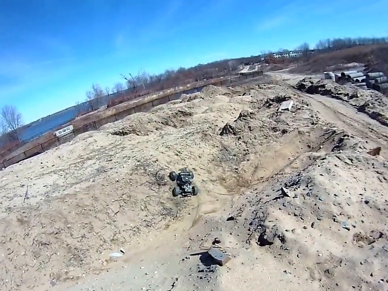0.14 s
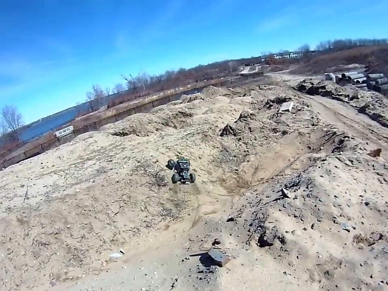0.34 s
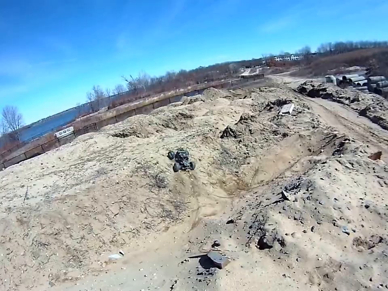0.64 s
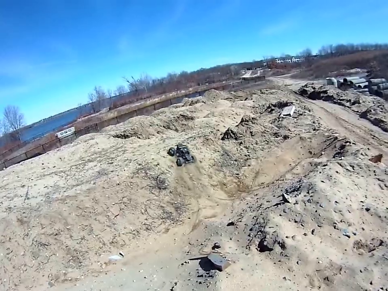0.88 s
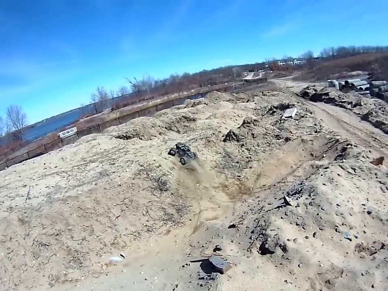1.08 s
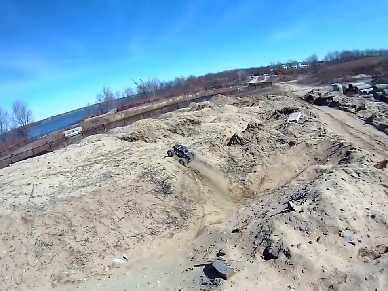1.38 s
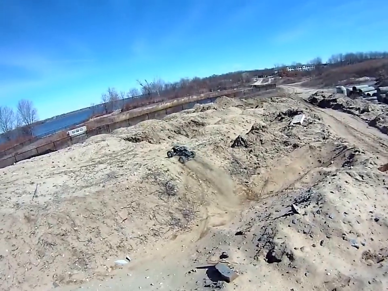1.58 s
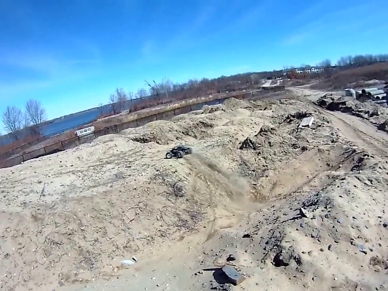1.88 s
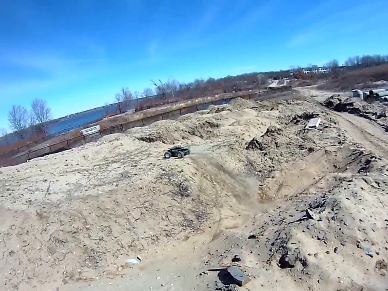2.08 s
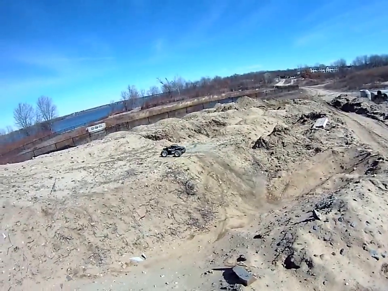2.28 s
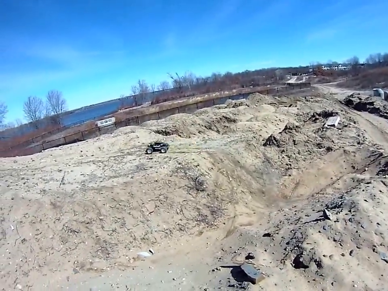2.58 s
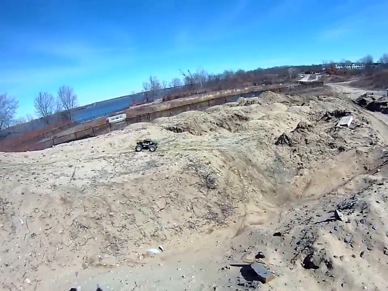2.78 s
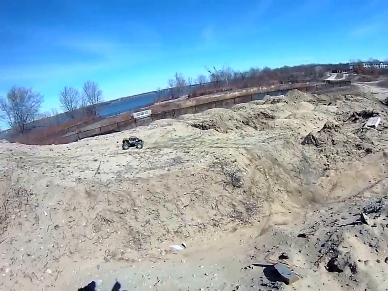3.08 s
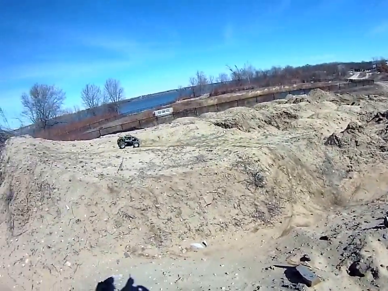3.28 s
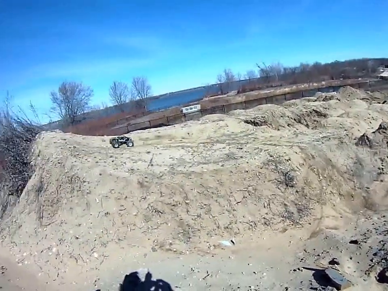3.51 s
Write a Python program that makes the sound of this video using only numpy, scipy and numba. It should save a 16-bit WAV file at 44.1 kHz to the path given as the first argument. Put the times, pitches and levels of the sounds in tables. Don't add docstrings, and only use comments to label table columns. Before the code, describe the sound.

A small electric radio-controlled truck pulls away loudly at once, its raspy gear whine jumping and sagging in quick surges, with chatter, sand hiss and small jolts. It gets quieter up the slope and fades around 2 s, leaving low wind rumble. At 2.25 s the motor restarts low with a knock, then climbs unevenly, growing louder and shrillest from 3.4 to 3.6 s. Thin, gritty outdoor camera sound.

```python
import sys
import numpy as np
from scipy import signal
from scipy.fft import rfft, irfft
from scipy.io import wavfile
from scipy.ndimage import uniform_filter1d
from numba import njit

SR = 44100
rng = np.random.default_rng(int(sys.argv[2]) if len(sys.argv) > 2 else 0)


def volts(x):
    e = np.asarray(x, float) / 20
    return 10 ** e


def put_to_file(sound):
    columns = np.atleast_2d(sound).T
    safe = np.clip(columns, -1, 1)
    whole_steps = np.round(safe * 32767)
    wavfile.write(sys.argv[1], SR, whole_steps.astype(np.int16))


N = 160965

HOLD_HZ = 12000
RING_HZ, RING_WIDTH_HZ = 2770, 287
LIFT_START_S, LIFT_END_S = 2.05, 2.25


def level(x, db):
    return x * volts(db) / np.sqrt(np.mean(x ** 2))


@njit
def svf(x, hz, width):
    y, band, low = np.empty(len(x)), 0., 0.
    g, damping = np.tan(np.pi * hz / SR), width / hz
    for i in range(len(x)):
        v = (band + g * (x[i] - low)) / (1 + g * (g + damping))
        band, low, y[i] = 2 * v - band, low + 2 * g * v, damping * v
    return y


def svf_twice(x, hz, width):
    return svf(svf(x, hz, width), hz, width)


def noise():
    return rng.standard_normal(N)


def walk(rate):
    hold = max(int(SR / rate), 2)
    steps = rng.standard_normal(1200)[np.arange(N) // hold % 1200]
    return 1.3 * uniform_filter1d(uniform_filter1d(steps, hold), hold)


def body(x):
    # (frequency [Hz], width [Hz], level [dB])
    resonances = [(897, 285, -4.5), (1306, 475, 0.5), (1940, 817, 0), (2560, 567, 3.5), (4040, 1210, -3),
                  (4446, 344, 0.5), (5397, 385, -9)]
    y = 0
    for k, (hz, width, db) in enumerate(resonances):
        y = y + (-1) ** k * volts(db) * svf(x, hz, width)
    y = y - 0.47 * svf(y, 1178, 120)
    return signal.sosfilt(signal.butter(6, 860, "high", fs=SR, output="sos"), y)


def throttle(t):
    # (time [s], tooth rate [Hz], level [dB])
    start = [
        (0, 500, -33.5),
        (.05, 490, -31),
        (.075, 650, -29.5),
        (.105, 675, -29),
        (.122, 630, -31),
        (.17, 635, -29.5),
        (.18, 700, -32),
        (.192, 745, -32.5),
    ]
    # (time [s], tooth rate [Hz], level [dB])
    climb = [
        [(0.2, 833.1, -32.5), (0.25, 894.3, -33), (0.27, 751.7, -30), (0.282, 789.4, -32.5),
         (0.338, 802.3, -33), (0.36, 700.0, -29.5), (0.382, 741.8, -31.5), (0.4, 856.9, -35.5),
         (0.43, 871.3, -31.5)],
        [(0.44, 868.0, -33), (0.466, 934.2, -33), (0.508, 882.9, -33), (0.548, 1022, -34.5),
         (0.608, 896.6, -34), (0.614, 826.2, -30.5), (0.622, 681.5, -33.5), (0.65, 871.0, -34),
         (0.66, 875.4, -34.5)],
        [(0.67, 871.5, -33), (0.69, 928.5, -33.5), (0.71, 1102, -34), (0.77, 1139, -34), (0.814, 747.2, -34),
         (0.84, 754.3, -33.5), (0.86, 926.6, -38), (0.882, 916.4, -35.5), (0.9, 821.7, -35.5)],
        [(0.91, 827.8, -37.5), (0.978, 814.5, -37), (1.032, 996.6, -37.5), (1.048, 947.4, -34.5),
         (1.08, 968.6, -40.5), (1.112, 1064, -36.5), (1.19, 1046, -35.5), (1.238, 1119, -35.5),
         (1.26, 1028, -37)],
        [(1.27, 931.9, -39.5), (1.306, 801.4, -35.5), (1.32, 880.4, -39.5), (1.42, 1048, -36.5),
         (1.452, 1060, -37), (1.506, 921.2, -36.5), (1.526, 973.7, -37), (1.586, 887.2, -35.5),
         (1.6, 933.6, -35.5)],
        [(1.61, 932.2, -36.5), (1.644, 1063, -36), (1.74, 1040, -37.5), (1.748, 988.4, -37.5),
         (1.884, 821.6, -39), (1.922, 873.2, -44), (1.944, 867.7, -42.5), (1.972, 771.0, -45),
         (2.03, 829.7, -52.5)],
    ]
    # (time [s], tooth rate [Hz], level [dB])
    flat = [
        [(2.25, 453.7, -55), (2.276, 457.8, -43.5), (2.296, 487.6, -38), (2.31, 571.7, -40),
         (2.336, 562.6, -39.5), (2.348, 537, -41), (2.368, 650.0, -37.5), (2.402, 737.5, -43.5),
         (2.41, 709.6, -37.5)],
        [(2.42, 685.5, -41), (2.43, 655.4, -39.5), (2.452, 621, -38.5), (2.468, 686.7, -41), (2.5, 755.0, -43),
         (2.516, 772.0, -45), (2.558, 752, -44), (2.576, 880.1, -40.5), (2.62, 957.9, -40.5)],
        [(2.63, 987, -40), (2.66, 910.8, -39.5), (2.708, 960, -39.5), (2.76, 916.5, -41), (2.818, 985, -40.5),
         (2.852, 994.6, -42.5), (2.866, 1038, -40), (2.89, 1216, -41), (2.9, 1229, -43)],
        [(2.91, 1219, -39), (2.924, 1237, -42), (2.948, 1363, -39), (2.976, 1286, -40.5), (2.994, 1345, -42.5),
         (3.012, 1260, -42), (3.05, 1439, -39), (3.08, 1238, -40), (3.12, 1391, -43)],
        [(3.13, 1380, -42.5), (3.176, 1526, -39.5), (3.218, 1192, -43.5), (3.258, 1365, -40),
         (3.288, 1194, -42), (3.308, 1380, -43.5), (3.324, 1453, -42.5), (3.348, 1347, -38),
         (3.37, 1535, -39.5)],
        [(3.38, 1635, -37), (3.4, 1580, -41.5), (3.42, 1790, -33), (3.44, 1714, -39.5), (3.454, 1913, -31),
         (3.482, 1803, -35.5), (3.504, 2040, -34), (3.54, 1855, -34), (3.645, 2068, -36.5)],
    ]
    rows = [tuple(row) for surge in [start] + climb + flat for row in surge]
    coast_db, fade_s = -72, 0.003
    lift = [(LIFT_START_S + fade_s, coast_db), (LIFT_END_S - fade_s, coast_db)]
    loud = np.array(sorted([(s, db) for s, _, db in rows] + lift))
    rows = np.array(rows)
    return np.interp(t, rows[:, 0], rows[:, 1]), np.interp(t, loud[:, 0], loud[:, 1])


def gear_whine(t, tooth_hz, knock, first_db, second_db, upper_db):
    # (time [s], share)
    slipping = [(0, .9), (.4, 1.0), (1.0, .85), (1.2, .65), (1.8, .65), (1.95, 1.1), (2.3, .6), (2.85, .6),
                (3.0, .95), (3.38, 1.0), (3.5, .85), (3.64, .85)]
    # (multiple of the tooth rate, level [dB])
    teeth = [(.5, -23), (1, 1.5), (1.5, -29), (2, 3.5), (3, -1), (4, 1.5), (5, -4.5), (6, -2)]
    slip = np.interp(t, *np.array(slipping).T)
    hz = tooth_hz * (1 + 0.022 * slip * walk(200) + 0.004 * walk(45))
    turn = 2 * np.pi * np.cumsum(hz) / SR
    load_db = {1: first_db, 2: second_db}
    whine = 0
    for k, db in teeth:
        flutter_db = 5 * (0.23 * knock + 0.72 * walk(230))
        swell_db = 1 * walk(8.96)
        break_db = 1.6 * walk(70)
        strength = volts(db + load_db.get(k, upper_db) + flutter_db + swell_db + break_db)
        smear_rad = 0.25 * slip * (1 + k)
        blur_rad = 1.3 * slip ** 2 * np.clip((k * hz - 3300) / 300, 0, 1)
        phase = k * turn + k * k + (smear_rad + blur_rad) * walk(320)
        whine = whine + strength * np.sin(phase) * (k * hz < HOLD_HZ / 2)
    whine = whine + volts(-3) * svf(whine, RING_HZ, RING_WIDTH_HZ)
    whine = signal.sosfilt(signal.butter(3, 3700, fs=SR, output="sos"), whine)
    unload_s = [1.92, 2.02, LIFT_END_S, LIFT_END_S + 0.027]
    return whine * volts(np.interp(t, unload_s, [0, -10, -10, 0])), turn


def gear_chatter(turn, knock, chatter_db):
    shake = volts(0.5 * knock + chatter_db)
    return (1 + 0.18 * np.cos(turn)) * shake * noise()


def thrown_sand():
    return (rng.random(N) < .012) * noise() * volts(1.3 * walk(39.97))


def tyre_rumble(t):
    # (time [s], rumble [dB])
    roll = [(0, -1), (.2, 1.5), (.4, 0.5), (.9, -1.5), (1.4, 1.5), (1.9, -4.5), (2.4, 3), (3.0, 6),
            (3.64, -1.5)]
    tread = svf(noise(), 207, 86) + 0.38 * svf(noise(), 660, 330)
    return tread * volts(1.7 * walk(14) + np.interp(t, *np.array(roll).T))


def jolts(t):
    # (time [s], boost [dB])
    ruts = [(0.103, 0), (0.11, 9), (0.343, 1), (.5731, 5), (2.2544, 14), (2.2767, 2), (2.434, 2.5),
            (2.5623, 10), (2.584, 3), (2.9553, 6), (2.9923, 6.5), (3.106, 4), (3.1704, 4), (3.2902, 11),
            (3.3097, 8), (3.3314, 8.5), (3.409, 5), (3.4481, 1), (3.503, 0)]
    decay_s = 0.0042
    return sum(db * (t > s) * np.exp(-np.abs(t - s) / decay_s) for s, db in ruts)


def truck(t):
    # (time [s], first order [dB], second order [dB], upper orders and shell [dB],
    # chatter [dB])
    load = [(0, -16, -6, 2.5, -11), (.12, 2, 6, 5.5, -6), (.35, 3.5, 8.5, 0, -5.5), (.47, 15, 9.5, 7, 1.5),
            (.61, 7.5, 6.5, -2, -6.5), (.75, 9, 0, 3, -4.5), (.95, 6, 7.5, -7, -2), (1.2, 5, 3, 0.5, -5),
            (1.55, 1, 3.5, -1, -5.5), (1.9, 6, 3.5, 1, -4), (2.3, 12, 7.5, 2, -4), (2.44, 1, 6, -0.5, 1),
            (2.7, 3, 9.5, 1, -7), (3.0, -0.5, 0.5, 8, -5.5), (3.3, 1, -1.5, 2.5, -2),
            (3.45, 10, 5, 3.5, -4), (3.55, 8.5, 0, 2, -11.5), (3.64, 6, 8, 2, -5)]
    load_s, *columns = np.array(load).T
    first_db, second_db, upper_db, chatter_db = [np.interp(t, load_s, column) for column in columns]
    tooth_hz, loud_db = throttle(t)
    knock = walk(230)
    whine, turn = gear_whine(t, tooth_hz, knock, first_db, second_db, upper_db)
    chatter = gear_chatter(turn, knock, chatter_db)
    shell_ring = svf_twice(chatter, RING_HZ, RING_WIDTH_HZ) * volts(upper_db)
    mix = level(body(whine), 0) + level(body(chatter), -5) + level(shell_ring, -6)
    mix = mix + level(body(thrown_sand()), -9) + level(tyre_rumble(t), -15)
    steady = np.sqrt(uniform_filter1d(mix ** 2, size=3000))
    return mix / steady * volts(loud_db + jolts(t))


def wind(t):
    # (frequency [Hz], level [dB per Hz])
    air = [(12, -31), (20, -7), (60, -4), (103, -7.5), (247, -17.5), (654, -26), (1100, -32), (2400, -30),
           (5800, -40), (7540, -93), (12800, -120)]
    # (frequency [Hz], width [Hz], level [dB])
    hums = [(34.8, 7.6, -52), (65.8, 16.6, -50.5), (99.4, 9.2, -57.5)]
    # (time [s], level [dB])
    gusts = [
        (0, 3.5),
        (.5, 0),
        (1.0, -0.5),
        (1.6, 2.5),
        (2.1, -2),
        (2.45, -1),
        (2.9, -2.5),
        (3.64, 0.5),
    ]
    # (time [s], level [dB], frequency [Hz])
    thumps = [
        (2.715, -29, 90),
        (1.64, -36, 45),
    ]
    air_hz, air_db = np.array(air).T
    out, swell = 0, walk(2.0)
    for hz in 25 * 2 ** np.arange(0, 7.9, .5):
        db = np.interp(np.log(hz), np.log(air_hz), air_db) + 0.17 * swell + 3.57 * walk(9.8)
        out = out + volts(db) * svf_twice(noise(), hz, hz / 2)
    out = level(out, -46.5)
    for hz, width, db in hums:
        out = out + level(svf_twice(noise(), hz, width), db)
    out = out * volts(np.interp(t, *np.array(gusts).T))
    for s, db, hz in thumps:
        bump = np.exp(-.5 * ((t - s) * hz / .5) ** 2)
        out = out + volts(db) * bump * np.cos(2 * np.pi * hz * (t - s))
    return out


def scene():
    t = np.arange(N) / SR
    return np.tile(truck(t) + wind(t), (2, 1))


def sample_and_hold(x, f, t):
    low = irfft(rfft(x) / np.sqrt(1 + (f / 5600) ** 24) * (f < HOLD_HZ / 2), N)
    comb = 1 + 2 * np.cos(2 * np.pi * HOLD_HZ * t - 0.28)
    slope = np.abs(np.sinc(f / HOLD_HZ)) * np.where(f > HOLD_HZ, -1, 1)
    return irfft(rfft(low * comb) * slope, N)


def side_hiss(held, treble_hiss, low_hiss):
    treble = svf(treble_hiss, 12600, 4800) + 0.67 * svf(treble_hiss, 6450, 1600)
    side = volts(-25.5) * treble
    side = side + volts(-24.5) * svf_twice(low_hiss, 500, 620)
    side = side + volts(-38.5) * svf(held * walk(200), 40, 110)
    return side + volts(-29) * svf(low_hiss, 1740, 2200)


def low_pass(x):
    return signal.sosfilt(signal.butter(12, 16310, fs=SR, output="sos"), x)


def record(dry):
    f, t = np.arange(N // 2 + 1) * SR / N, np.arange(N) / SR
    held = sample_and_hold(dry, f, t)
    size = np.sqrt(uniform_filter1d(svf(held[0], 2100, 4300) ** 2, size=150))
    step_noise, treble_hiss, low_hiss = size * rng.standard_normal((3, N))
    side = side_hiss(held[0], treble_hiss, low_hiss)
    clock_tone = volts(-90) * np.sin(2 * np.pi * HOLD_HZ * t)
    held = held + volts(-17.5) * step_noise + clock_tone
    stereo = held + side * np.array([[1], [-1]])
    mix = irfft(rfft(stereo) * (f < 15780), N)
    return low_pass(mix)


dry = scene()
out = record(dry)
put_to_file(out)
```